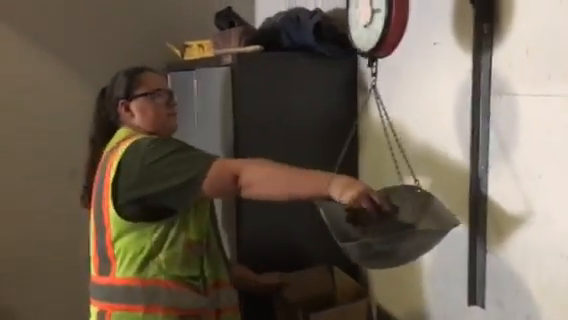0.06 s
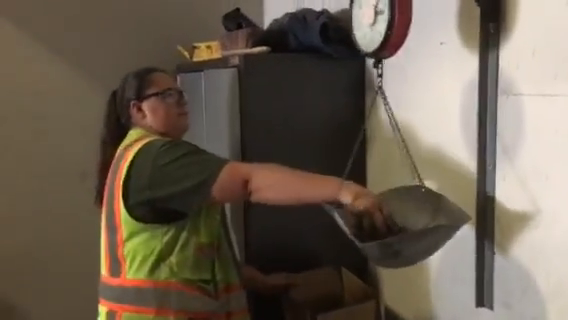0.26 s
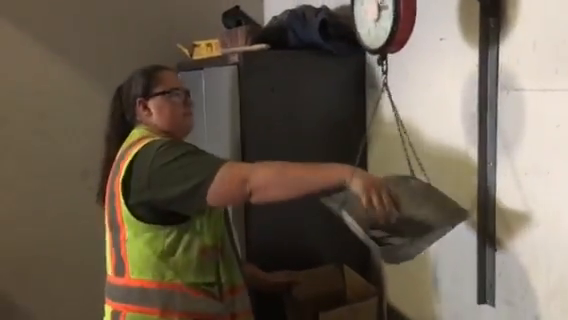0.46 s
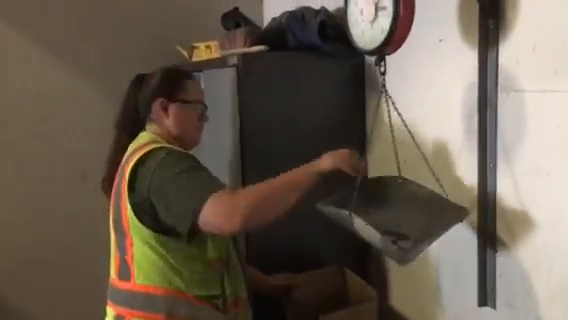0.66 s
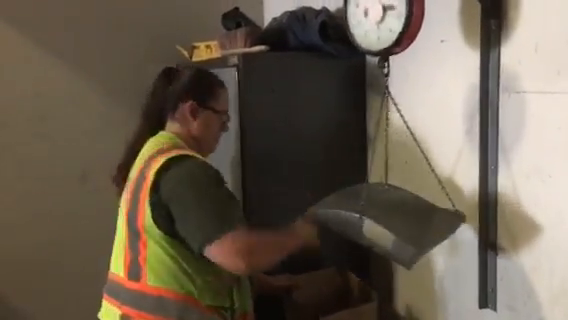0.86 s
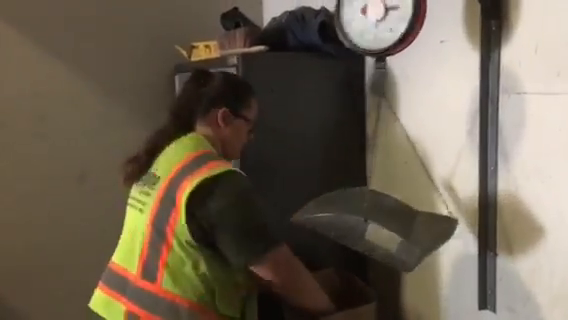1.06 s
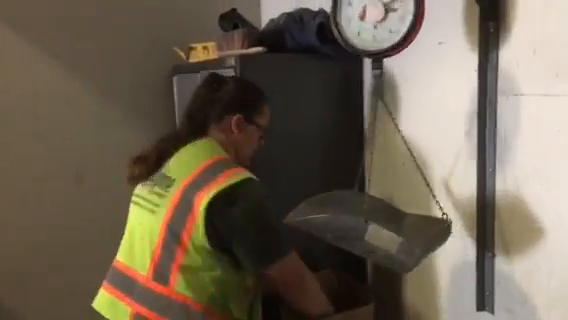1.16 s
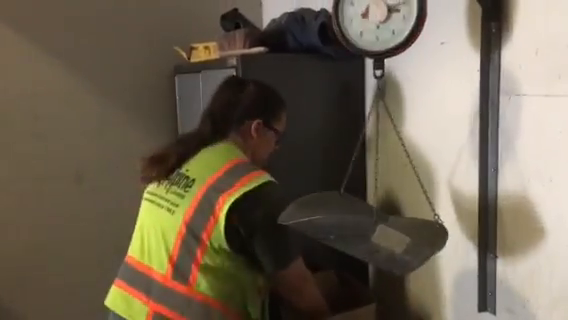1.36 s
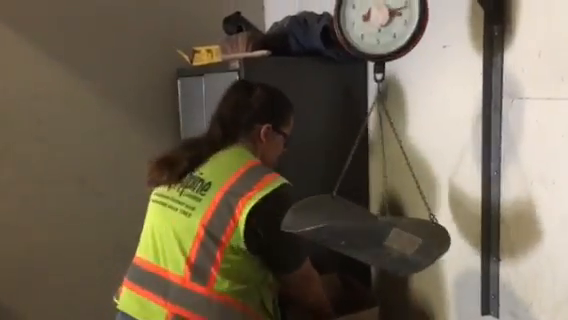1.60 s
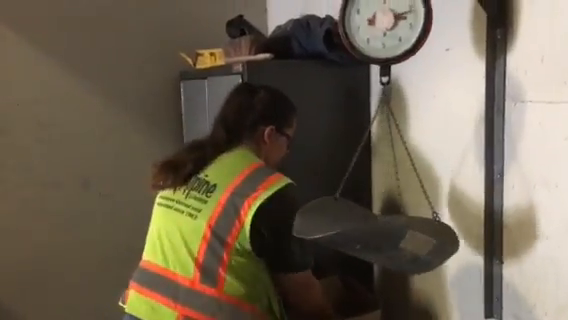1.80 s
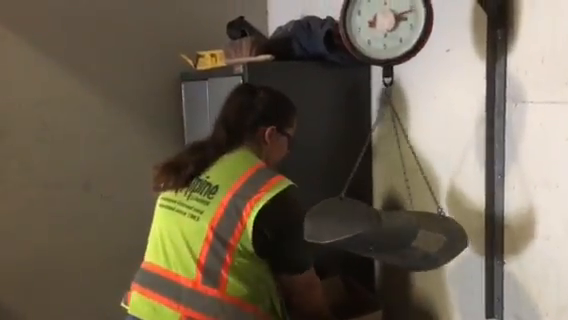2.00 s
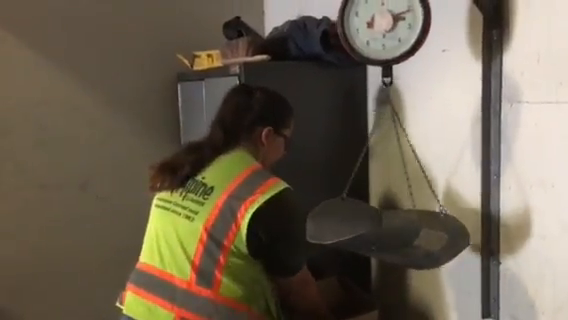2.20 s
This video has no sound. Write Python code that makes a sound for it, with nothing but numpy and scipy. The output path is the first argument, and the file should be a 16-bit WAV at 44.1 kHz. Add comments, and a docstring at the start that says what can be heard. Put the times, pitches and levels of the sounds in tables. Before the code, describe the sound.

Small steel pieces clatter in quick clumps into a hanging scale's metal pan, which rings briefly. A hand then rummages in a cardboard box with faint clicks, slides and bumps, in a slightly echoing workshop with a low rumble.

```python
"""Steel shims in a scale pan

A handful of small steel shims lands in clumps in the sheet-metal pan of a hanging scale; they skitter
and set the pan ringing. A hand then rummages in a cardboard box for more: shims click and slide, the
box bumps. The workshop reverberates over a low rumble. Automatic gain ducks the crash."""
import sys
import numpy as np
from scipy import signal
from scipy.fft import rfft, irfft, next_fast_len
from scipy.io import wavfile
from scipy.ndimage import uniform_filter1d

SR = 44100
rng = np.random.default_rng(int(sys.argv[2]) if len(sys.argv) > 2 else 0)


def wrap_up_sound(samples):
    """Save the sound to the file named by the first command line argument, as 16-bit audio."""
    columns = np.atleast_2d(samples).T
    # keep every value between -1 and 1, then stretch to whole-number steps
    tamed = np.clip(columns, -1, 1)
    steps = np.round(tamed * 32767).astype(np.int16)
    wavfile.write(sys.argv[1], SR, steps)


N = 99225


def amp(db):
    """Decibels to gain."""
    return 10 ** (np.asarray(db) / 20)


def unit_rms(x):
    return x / np.sqrt(np.mean(x ** 2) + 1e-20)


def unit_energy(x):
    return x / np.sqrt(np.sum(x ** 2) + 1e-20)


def fade(t, t60_s):
    """Exponential decay; 1 for t < 0."""
    return amp(-60 * np.maximum(t, 0) / max(t60_s, 1e-3))


def add(out, start_s, x):
    """Mix x into out."""
    i = max(round(start_s * SR), 0)
    out[i:i + len(x)] += x[:max(len(out) - i, 0)]


def curve(points):
    """Curve through (f, value) points on a log frequency axis."""
    f, value = np.transpose(points)
    return lambda hz: np.interp(np.log(hz + 1), np.log(f + 1), value)


def tilted(points, db_per_oct, corner_hz):
    """dB curve with a slope added above the corner."""
    return lambda hz: curve(points)(hz) + db_per_oct * np.log2(1 + hz / corner_hz)


def hump(centre_hz, half_width_oct):
    """dB curve of one broad resonance."""
    return lambda hz: np.maximum(-3 * (np.log2((hz + 1) / centre_hz) / half_width_oct) ** 2, -60)


def colour(x, gain_db):
    """Minimum-phase filter with response gain_db(hz)."""
    m = 2 * next_fast_len(len(x))
    gain = np.maximum(amp(gain_db(np.fft.rfftfreq(m, 1 / SR))), 1e-6)
    cepstrum = irfft(np.log(gain))
    cepstrum[1:m // 2] *= 2
    cepstrum[m // 2 + 1:] = 0
    return irfft(rfft(x, m) * np.exp(rfft(cepstrum)), m)[:len(x)]


def contacts(size, per_s, spread_db):
    """Random tiny impacts of uneven strength, rms 1."""
    hit = rng.random(size) < per_s / SR
    hit[0] = True
    sign = rng.choice([-1, 1], size)
    strength = amp(spread_db * np.clip(rng.standard_normal(size), -2, 2))
    return unit_rms(hit * sign * strength)


def dense_ring(t60_table, size):
    """Impulse response of countless modes, each band dying at its own rate."""
    hz, t, bands = signal.stft(rng.standard_normal(size), SR, nperseg=256)
    decay = amp(-60 * t / curve(t60_table)(hz)[:, None])
    return unit_energy(signal.istft(bands * decay, SR, nperseg=256)[1][:size])


# Air spectrum: f/Hz, relative level/dB
AIR_SPECTRUM = [(20, -10.5), (72, 1.5), (140, -2), (220, -16.5), (500, -19.5), (1700, -18), (4500, -27.5),
                (16000, -61)]


def workshop_air():
    """Steady low rumble."""
    return amp(-48.5) * unit_rms(colour(rng.standard_normal(N), curve(AIR_SPECTRUM)))


# Shim on shim: t/s, level/dB, scrape/s, tilt/(2 dB/oct)
SHIM_CLICKS = [(0.159, -43, 0.0029, 0.5), (0.235, -30, .025, 9), (0.907, -40, 0.013, -4.5),
               (0.963, -36.5, 0.0026, -1.5), (1.164, -44, 0.0086, -5), (1.308, -39, 0.01, 3),
               (1.44, -40.5, 0.0025, -2), (1.502, -42, 0.016, 0), (1.64, -39, 0.0067, -0.5),
               (1.676, -34, 0.0047, 2.5), (1.722, -32, 0.0043, -0.5), (1.844, -26, 0.0094, 2.6),
               (1.859, -32.5, 0.012, 1.5), (1.895, -34.5, 0.0073, 2), (1.919, -30.5, 0.00071, -3),
               (1.975, -34.5, 0.0028, 1.5), (1.998, -34, 0.0046, 1.2), (2.17, -38, 0.0066, 1),
               (2.184, -35.5, 0.0071, -3), (2.225, -39, 0.01, -3.5)]
# Click spectrum: f/Hz, relative level/dB
CLICK_SPECTRUM = [(200, -13), (800, -1.5), (2500, -1.5), (5400, 2.5), (7300, -4), (10000, -3.5),
                  (16000, -17)]


def shim_clicks():
    """Shims meet in a brief scrape; the pile damps their ring."""
    out, t = np.zeros(N), np.arange(SR // 5) / SR
    for start_s, db, scrape_s, tilt in SHIM_CLICKS:
        push = fade(t - scrape_s, 0.012)
        force = push * contacts(len(t), per_s=2500, spread_db=2.9)
        crack = unit_energy(rng.standard_normal(len(t)) * fade(t, 0.04))
        crack[0] += 0.8  # direct impulse
        mode_hz = rng.uniform(2500, 14000, size=(30, 1))
        ring = unit_energy(np.sin(2 * np.pi * mode_hz * t).sum(0) * fade(t, 0.27))
        click = signal.fftconvolve(force, crack + amp(-7.5) * ring)[:len(t)]
        click = unit_energy(colour(click, tilted(CLICK_SPECTRUM, 2 * tilt, corner_hz=1800)))
        add(out, start_s, amp(db) * np.linalg.norm(push) * click)
    return out


# Dense ring of shims and pan: f/Hz, relative level/dB
CLATTER_SPECTRUM = [(40, -25.5), (240, -9), (305, -14.5), (390, -6), (510, -5), (600, -10), (1100, -2),
                    (2500, -5), (4200, -5), (4950, -8.5), (5600, -7.5), (9300, -15.5), (12600, -15),
                    (16000, -24.5)]
# Its decay: f/Hz, T60/s
CLATTER_DECAY = [(1500, 0.22), (14000, 0.079)]


def clatter(force, db_per_oct, mode_sets=6):
    """Shims and pan ring together; every 3 ms the contacts meet a random set of modes."""
    size = len(force)
    struck_set = rng.integers(mode_sets, size=size // 128 + 1).repeat(128)[:size]
    sound = 0.4 * force
    for k in range(mode_sets):
        sound += signal.fftconvolve(force * (struck_set == k), dense_ring(CLATTER_DECAY, SR // 4))[:size]
    return unit_energy(colour(sound, tilted(CLATTER_SPECTRUM, db_per_oct, corner_hz=400)))


# Strongest pan modes: f/Hz, relative level/dB
SHEET_MODES = [(535, -3), (1087, -1), (1932, -3), (3135, -4), (3384, -4), (3595, -2), (5399, -2),
               (8400, -6)]


def pan_modes(force, db_per_oct, t60_at_1khz_s=0.22):
    """Contacts drive the sheet metal's modes; higher ones die sooner."""
    out, t = np.zeros(len(force)), np.arange(len(force)) / SR
    for hz, db in SHEET_MODES:
        mode = np.sin(2 * np.pi * hz * t) * fade(t, t60_at_1khz_s * (hz / 1000) ** -0.12)
        ringing = unit_energy(signal.fftconvolve(force, mode)[:len(t)])
        out += amp(db + db_per_oct * np.log2(1 + hz / 400)) * ringing
    return unit_energy(out)


def pan_thud(t):
    """The weight of a clump's first blow on the pan's bottom."""
    burst = rng.standard_normal(len(t)) * fade(t, 0.16)
    bottom = hump(centre_hz=340, half_width_oct=0.54)
    return unit_energy(colour(burst, lambda hz: curve(CLATTER_SPECTRUM)(hz) + bottom(hz)))


# Landings: t/s, level/dB, blow over skitter/dB, skitter/s, T60/s, tilt/(dB/oct)
LANDINGS = [(0.219, -31, 7, 0.02, 0.07, -1.6), (.237, -26, 8.5, 0.049, 0.35, -2.5),
            (0.33, -17, 3, 0.054, 0.16, -0.5), (.386, -20, 3.5, 0.058, 0.22, 1.2),
            (.456, -16, 5, 0.056, 0.082, -0.5), (.503, -12.5, -4.5, 0.013, 0.42, 1.45),
            (.560, -8.5, 6, 0.031, 0.14, 1.75), (.622, -18.5, 2, 0.016, 0.18, -0.5)]


def landing_clumps(touchdown_s=0.0028, blow_s=0.012, modes_db=-13.5, thud_db=-19):
    """Each clump hits the pan with a blow, then a shower of contacts."""
    out, t = np.zeros(N), np.arange(SR // 2) / SR
    onset = np.sqrt(1 - np.exp(-(t + 1 / SR) / touchdown_s))
    for start_s, db, blow_db, skitter_s, t60_s, db_per_oct in LANDINGS:
        blow = amp(blow_db * fade(t - blow_s, 0.049))
        push = onset * blow * fade(t - skitter_s, t60_s)
        force = push * contacts(len(t), per_s=2500, spread_db=3.5)
        sound = clatter(force, db_per_oct) + amp(modes_db) * pan_modes(force, db_per_oct)
        sound += amp(blow_db + thud_db) * pan_thud(t)
        add(out, start_s, amp(db) * np.linalg.norm(push) * sound)
    return out


def pan_flex(hz=111.5, db=-28.5, t60_s=0.67):
    """The empty pan flexes under the first clump."""
    out, t = np.zeros(N), np.arange(SR // 2) / SR
    envelope = (1 - fade(t, 0.11)) * fade(t, t60_s)
    add(out, LANDINGS[0][0], amp(db) * envelope * np.sin(2 * np.pi * hz * t))
    return out


# Edge landings: t/s, f/Hz, level/dB, T60/s
EDGE_NOTES = [(.236, 2316, -30, 1), (.345, 1108, -10.5, 0.14), (.35, 2406, -17, 0.29),
              (0.487, 3990, -20, 0.31), (.505, 11262, -32, 0.14), (.559, 1043, -9.5, 0.17),
              (.568, 5300, -24, 0.14), (.618, 830.5, -9.5, 0.13), (0.62, 1048, -16, 0.15)]


def edge_notes(linewidth_hz=33, rise_s=0.0032):
    """A shim landing on its edge makes one note stand out, wavering as the pieces shift."""
    out, t = np.zeros(N), np.arange(SR // 2) / SR
    for start_s, hz, db, t60_s in EDGE_NOTES:
        waver_rad = np.cumsum(rng.standard_normal(len(t))) * np.sqrt(2 * np.pi * linewidth_hz / SR)
        envelope = (1 - np.exp(-t / rise_s)) * fade(t, t60_s)
        add(out, start_s, amp(db) * envelope * np.sin(2 * np.pi * hz * t + waver_rad))
    return out


# Hand movement, end levels held: t/s, bump level/dB, slide level/dB
HAND_LEVELS = [(0.801, -54, -72), (.97, -47, -67), (1.19, -59.5, -64), (1.257, -52, -47.5),
               (1.351, -46, -44), (1.42, -47, -54.5), (1.57, -51, -56.5), (1.65, -46, -50.5),
               (1.83, -47.5, -44.5), (1.88, -45, -41), (2.04, -51, -51), (2.14, -51.5, -60),
               (2.18, -52.5, -41), (2.25, -45, -40.5)]
# Bumping cardboard: f/Hz, relative level/dB
BUMP_SPECTRUM = [(40, -34.5), (110, -1.5), (250, 2), (420, -10), (14000, -42)]
# Sliding shims: f/Hz, relative level/dB
SLIDE_SPECTRUM = [(150, -6), (450, 1), (900, 0.5), (1600, -7), (5800, -6), (12000, -15), (16000, -20)]


def rummage():
    """The hand bumps the box and stirs the shims."""
    times_s, bump_db, slide_db = np.transpose(HAND_LEVELS)
    t = np.arange(N) / SR
    bumps = unit_rms(colour(contacts(N, per_s=300, spread_db=0.53), curve(BUMP_SPECTRUM)))
    grit = contacts(N, per_s=1000, spread_db=2.6) + 0.5 * rng.standard_normal(N)
    slide = unit_rms(colour(grit, curve(SLIDE_SPECTRUM)))
    return amp(np.interp(t, times_s, bump_db)) * bumps + amp(np.interp(t, times_s, slide_db)) * slide


# Modes of a free shim: f/Hz, relative level/dB
CHIME_MODES = [(5010, 0), (8495, -9), (12400, -15), (13400, -12)]


def shim_chime(start_s=1.256, level_db=-41.5, t60_s=0.24):
    """One shim hangs free of the pile and rings."""
    out, t = np.zeros(N), np.arange(SR // 5) / SR
    envelope = (1 - fade(t, 0.0058)) * fade(t, t60_s)
    for hz, db in CHIME_MODES:
        add(out, start_s, amp(level_db + db) * envelope * np.sin(2 * np.pi * hz * t))
    return out


# Knocks on the box: t/s, level/dB, f/Hz
BOX_KNOCKS = [(1.652, -35, 720), (1.920, -35.5, 606), (2.014, -41, 232), (2.229, -48, 805)]


def box_knocks(t60_s=0.072):
    """Each knock excites one broad resonance of the cardboard."""
    out, t = np.zeros(N), np.arange(SR // 5) / SR
    push = fade(t, t60_s)
    for start_s, db, hz in BOX_KNOCKS:
        knock = colour(push * rng.standard_normal(len(t)), hump(hz, half_width_oct=0.59))
        add(out, start_s, amp(db) * np.linalg.norm(push) * unit_energy(knock))
    return out


# Workshop decay: f/Hz, T60/s
ROOM_DECAY = [(200, 0.6), (1500, 1.08), (5500, 1.02), (15000, 0.4)]


def workshop_reverb(x, responses=5, crossfade_s=0.06):
    """Diffuse reverberation; crossfading random responses keeps the tail smooth and free of tones."""
    out, turn = np.zeros(N), np.arange(N) / SR / crossfade_s
    for k in range(responses):
        offset = abs((turn - k + 1) % responses - 1)
        weight = np.sin(np.pi / 2 * np.clip(1 - offset, 0, 1))
        out += signal.fftconvolve(x * weight, dense_ring(ROOM_DECAY, SR))[:N]
    return out


def scene():
    """Pan and box in the workshop, over its steady air; mono."""
    pan = landing_clumps() + pan_flex() + edge_notes()
    direct = pan + shim_clicks() + rummage() + shim_chime() + box_knocks()
    return (direct + amp(-22) * workshop_reverb(direct) + workshop_air())[None]


def record(dry):
    """Automatic gain drops on the crash and recovers slowly; a steep low-pass follows."""
    threshold_db, share_removed, recovery_db_per_s, top_hz = -26, 0.38, 24.5, 16150
    level_db = 10 * np.log10(np.abs(uniform_filter1d(dry[0] ** 2, size=220)) + 1e-12)
    cut_db = share_removed * np.maximum(level_db - threshold_db, 0)
    recovery_db = recovery_db_per_s * np.arange(N) / SR
    held_db = np.maximum.accumulate(cut_db + recovery_db) - recovery_db
    ducked = dry * amp(-uniform_filter1d(held_db, size=90))
    m = next_fast_len(N + SR // 2)
    lowpass = np.clip((top_hz - np.fft.rfftfreq(m, 1 / SR)) / 500, 0, 1) ** 2
    return irfft(rfft(ducked, m) * lowpass, m)[..., :N]


dry = scene()
out = record(dry)
wrap_up_sound(out)
```